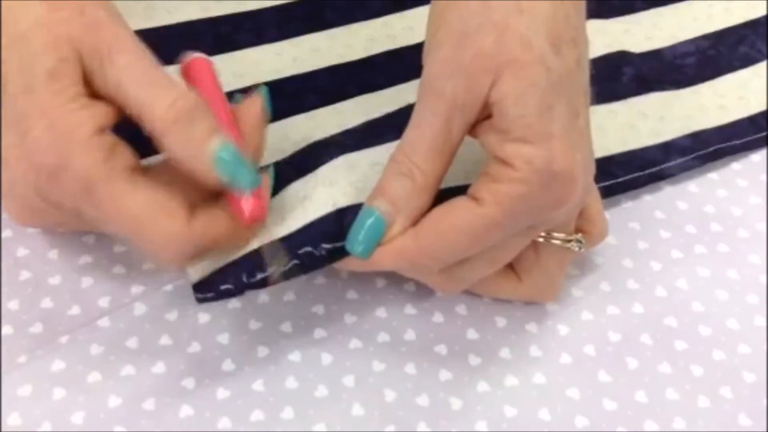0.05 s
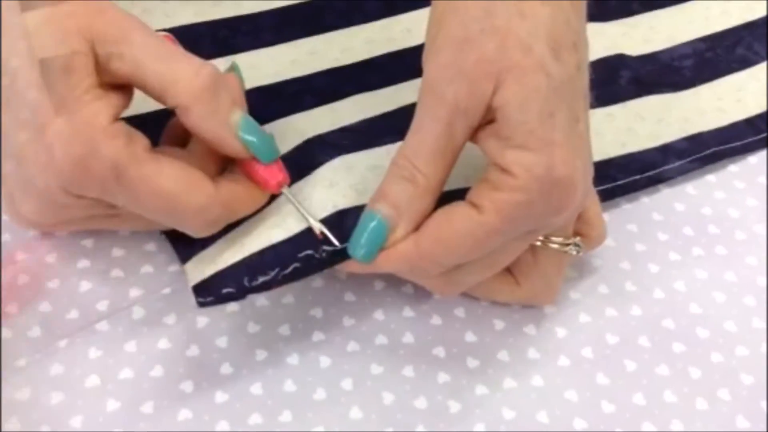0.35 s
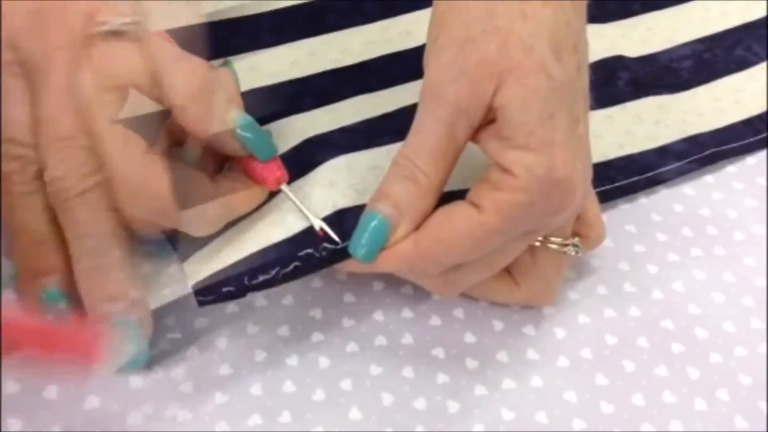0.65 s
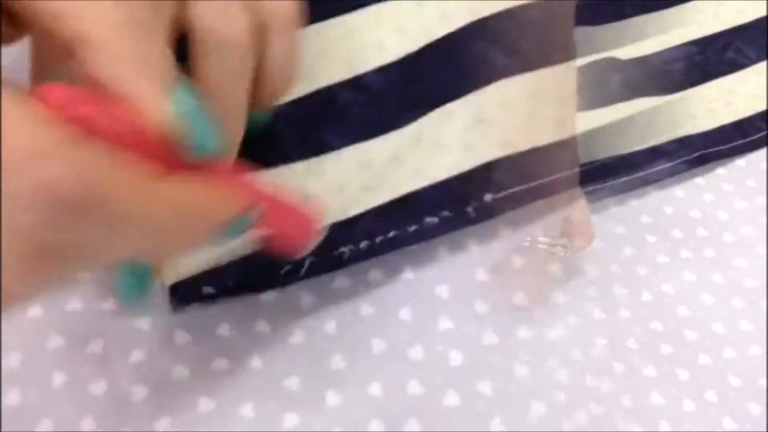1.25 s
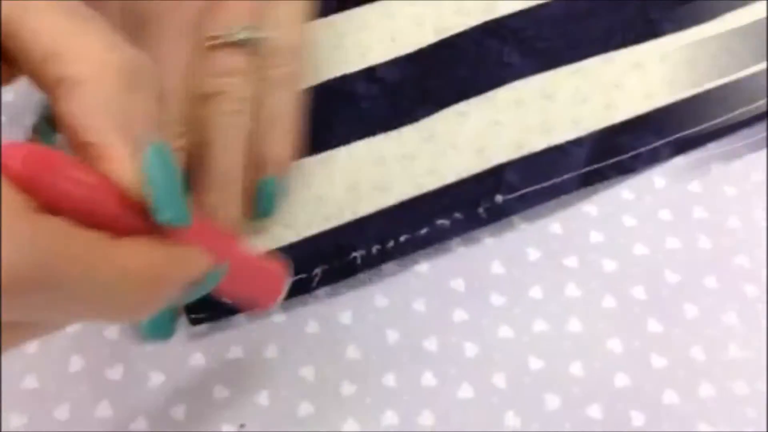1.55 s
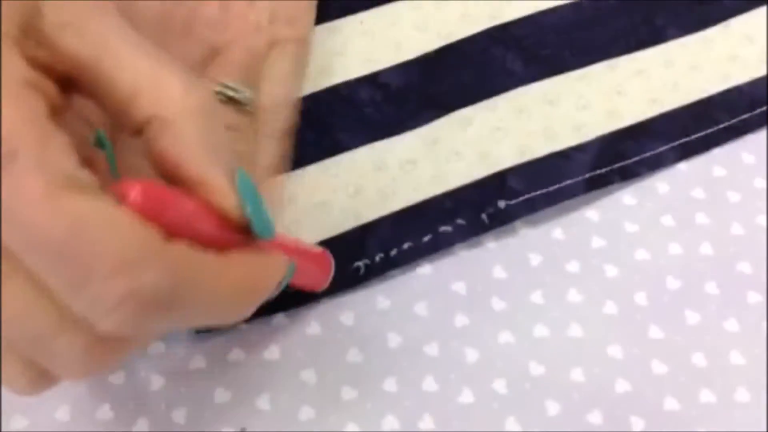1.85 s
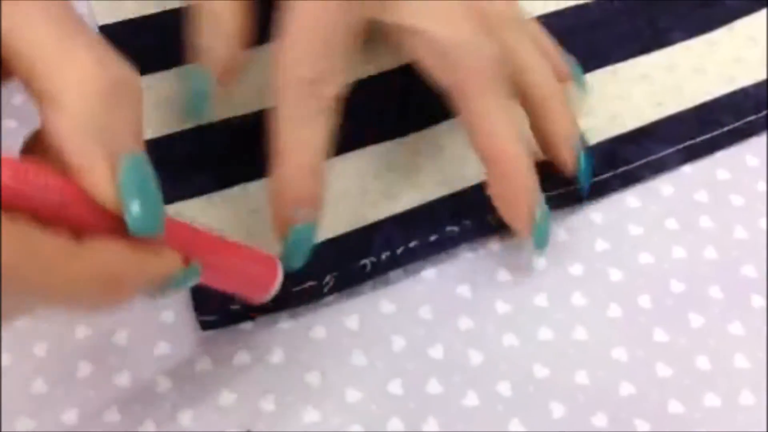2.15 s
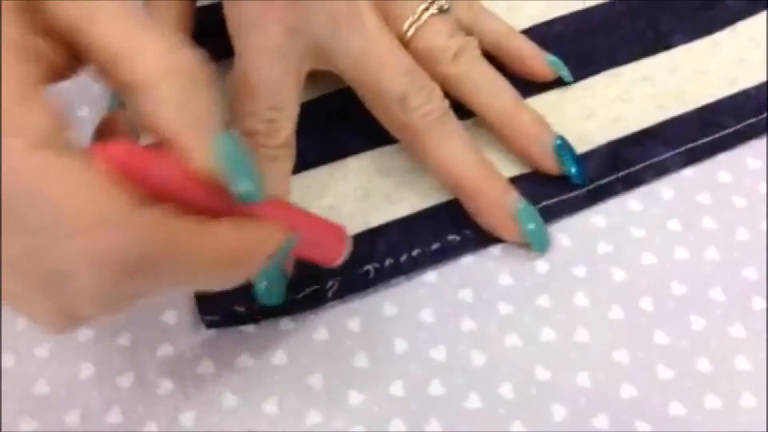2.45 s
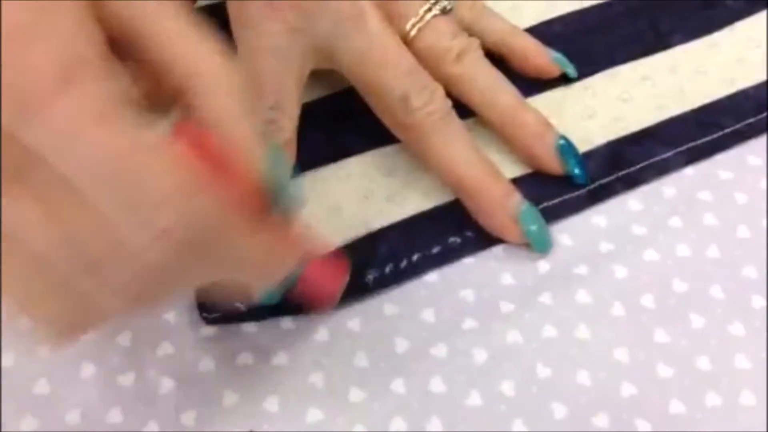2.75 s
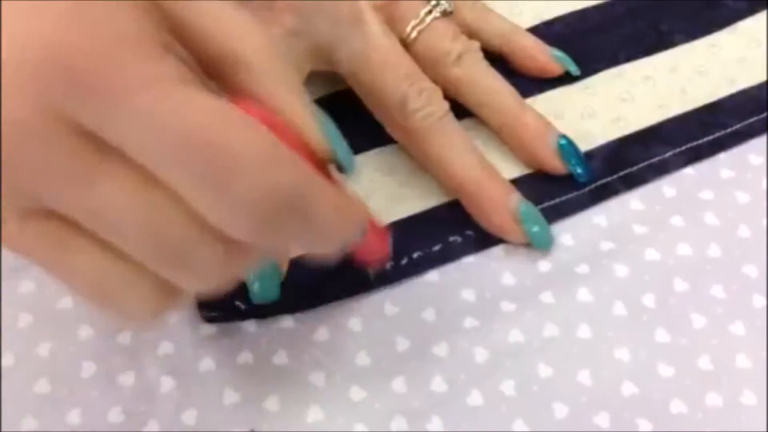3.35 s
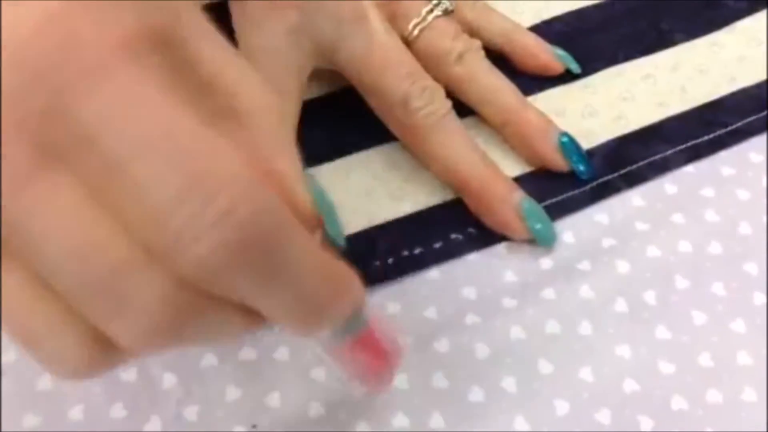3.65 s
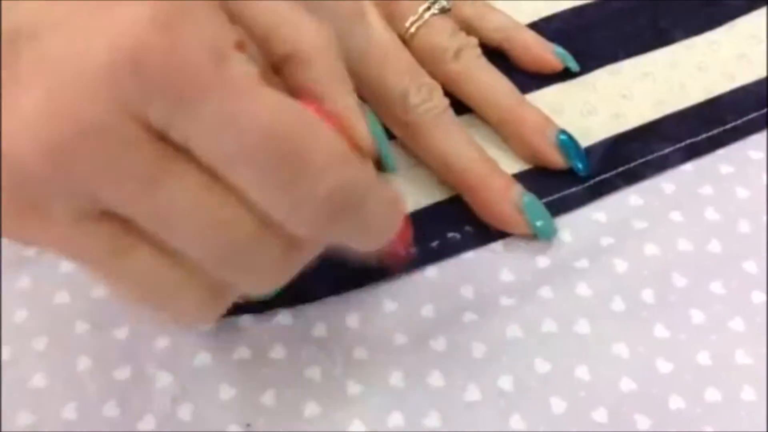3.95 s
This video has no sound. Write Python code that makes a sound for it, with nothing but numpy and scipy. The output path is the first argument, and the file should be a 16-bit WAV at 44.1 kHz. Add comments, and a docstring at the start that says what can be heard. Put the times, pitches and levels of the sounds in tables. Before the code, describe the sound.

A seam ripper scratches and rubs on cloth over a table, close by in a quiet room. A short scrape with light knocks comes at about 0.3 seconds. Until 2.3 seconds, hands swish over the fabric with scattered taps and faint ticks. From 2.6 seconds to the end at 4, the tool scrubs about five times a second, with raspy strokes, soft table bumps and tiny thread snaps.

```python
"""Seam ripper on cloth

Hands work close by on cloth spread over a table. A seam ripper scrapes and is turned round, palms
smooth the cloth and fingernails tap down. Then the tool's rubbery cap scrubs the seam about five
times a second: each stroke bumps the table top, rubs the weave and snaps at loose threads."""
import sys
import numpy as np
from scipy import signal
from scipy.fft import rfft, irfft
from scipy.io import wavfile

SR = 44100
rng = np.random.default_rng(int(sys.argv[2]) if len(sys.argv) > 2 else 0)


def generate_wav(sig):
    """Save sig (samples, or channels by samples) to the path in sys.argv[1] as 16-bit PCM at SR."""
    pcm = np.round(np.clip(np.atleast_2d(sig).T, -1, 1) * 32767).astype(np.int16)
    wavfile.write(sys.argv[1], SR, pcm)


N = 176400  # 4 seconds

# Drags over the weave, first to shift the cloth, then to scrub it: t/s, half length/s, level/dB
DRAGS = [(0.525, 0.044, -48.5), (1.152, 0.06, -48.5), (1.394, 0.029, -53), (2.65, 0.026, -48),
         (2.709, 0.018, -37.5), (2.776, 0.016, -43.5), (2.872, 0.039, -40.5), (2.998, 0.038, -49.5),
         (3.086, 0.024, -40.5), (3.142, .021, -40.5), (3.205, 0.02, -44), (3.301, 0.035, -37.5),
         (3.418, 0.019, -41), (3.49, 0.022, -36.5), (3.546, 0.013, -40.5), (3.641, .038, -40),
         (3.699, 0.021, -43), (3.768, 0.025, -41), (3.84, .027, -40), (3.93, 0.044, -41.5)]
# Tone of rubbed cloth: f/Hz, level/dB
CLOTH_TONE = [(300, -16), (1000, -3), (2000, -2.5), (3000, -4), (5000, -8), (6500, -6), (9000, -1.5),
              (12000, -3.5), (14000, -2), (16000, -3.5)]
# Middles of the bands in which the fibres rasp: f/Hz
RASP_BANDS = [5470, 7400, 14600]
FLUTTERS_PER_S = 200  # how fast the loudness of rubbing wavers


def scrubbing():
    """The cap or a finger drags across the weave, and fine fibres rasp under it in quick bunches."""
    pressure = sum(undb(db) * swell(at, width, width) for at, width, db in DRAGS)
    fibres = np.zeros(N)
    for hz in RASP_BANDS:
        catches = slips(per_s=1500, spread_db=3.3)
        fibres += colour(catches, around(hz, CLOTH_TONE, octaves=0.77))
    bunches = undb(6.5 * np.minimum(wander(FLUTTERS_PER_S), 2))
    rasp = undb(-2) * unit(fibres * bunches)
    weave = undb(-9.5) * noise(CLOTH_TONE)
    return pressure * (rasp + weave)


# Threads that catch and snap free: t/s, level/dB
THREAD_SNAPS = [(.469,-31.5),(0.5428,-27.5),(1.1068,-21),(1.151,-26),(1.173,-32.5),(1.1891,-26.5),(1.2715,-33.5),(1.3867,-33),(1.4142,-30.5),(2.644,-17),(2.695,-20.5),(2.708,-17),(2.7198,-18.5),(2.7702,-28),(2.81,-23),(2.886,-24.5),(2.8966,-26.5),(2.937,-23.5),(2.952,-22),(2.9999,-19.5),(3.0083,-13),(3.079,-13.5),(3.0885,-20),(3.1267,-16),(3.1531,-15),(3.255,-24),(3.2737,-24),(3.359,-14),(3.3626,-14.5),(3.3891,-23.5),(3.473,-24.5),(3.5514,-20.5),(3.565,-18),(3.569,-19),(3.6025,-20),(3.631,-19),(3.733,-23.5),(3.76,-19.5),(3.764,-22),(3.7759,-15.5),(3.81,-18),(3.8276,-16),(3.836,-19),(3.922,-21.5),(3.9406,-19.5)]


def thread_snaps():
    """Each thread lets go with a tiny high click, a brief rustle and a faint echo."""
    out, t = np.zeros(N), np.arange(SR // 20) / SR
    rustle = undb(-9.5) * np.exp(-t / 0.0012)
    echo = undb(-30) * np.exp(-t / 0.011)
    age = t / 0.000055  # reaches 1 where the click is strongest
    for at, db in THREAD_SNAPS:
        hz = 10020 * 2 ** (0.23 * rng.standard_normal())  # every snap has its own pitch
        click = age * np.exp(1 - age) * np.sin(2 * np.pi * hz * t)
        tail = (rustle + echo) * noise(around(hz, CLOTH_TONE, octaves=1), len(t))
        add(out, at, undb(db + 2) * (click + tail))
    return highpass(out, hz=2920)


# Notes the table top rings at: f/Hz, level/dB, time to fade by 60 dB/s
TABLE_NOTES = [(117.2, -8.5, 0.46), (187.9, -8, 0.25), (224.1, 1.5, 0.24), (313.5, -2.5, 0.17),
               (370, -12, 0.16), (546.7, -0.5, 0.092), (787, -16, 0.14), (866, -12.5, 0.17),
               (1218, 5, 0.043), (1510, -11, 0.02), (2130, 1.5, 0.036), (2440, 2, 0.026)]
# Tone of the dull thud in every blow: f/Hz, level/dB
THUD_TONE = [(90, -8), (180, 2), (300, -0.5), (430, -17), (700, -29.5)]
# Tone of the table's many crowded higher notes: f/Hz, level/dB
CLATTER_TONE = [(300, -57), (550, 4.5), (950, -2), (1350, 3), (2000, -2), (2700, -0.5), (3400, -14),
                (4200, 3), (5500, -31), (12000, -33)]


def table_ring(low_db=0, hard=True):
    """One blow makes the table ring and thud; a hard one makes it clatter too."""
    t = np.arange(SR // 2) / SR
    notes = []
    for hz, db, t60 in TABLE_NOTES:  # resting hands shift each note a little
        detune, louder = rng.standard_normal(2)
        notes.append((hz * (1 + 0.02 * np.tanh(detune)), db + 2 * louder, t60))
    thud_shape = fade(t, t60=0.19) * (1 - fade(t, t60=0.014))
    thud = undb(low_db - 0.5) * thud_shape * noise(THUD_TONE, len(t))
    clatter_shape = undb(10.5) * fade(t, t60=0.023) + undb(-4) * fade(t, t60=0.17)
    clatter = clatter_shape * noise(CLATTER_TONE, len(t))
    return ring(notes, low_db) + thud + hard * clatter


# Hard knocks of nail or tool: t/s, level/dB, treble cut-off/Hz, bass boost/dB, crack boost/dB
HARD_KNOCKS = [(0.3157, -38.5, 2160, 4, -22), (.359, -38, 1310, 2.5, -18), (.624, -49.5, 1740, 9, -30),
               (1.5112, -40.5, 1560, -1.5, -16), (1.5165, -36, 2970, -5, -6),
               (1.589, -40.5, 1570, -2.5, -24), (2.1751, -40, 2410, 1.5, -32),
               (2.271, -41, 3120, 0.5, -0.5), (2.6517, -38, 3220, 7.5, 5.5), (2.871, -40, 1910, 6.5, -4),
               (3.0745, -48, 3220, -29, -7), (3.078, -39, 2380, 2, 4.5), (3.2561, -43.5, 2620, -11, 5),
               (3.2873, -39, 3340, 3.5, 6), (3.49, -37, 1900, 2.5, -16), (3.688, -37, 2550, 2.5, 8.5),
               (3.872, -43, 2220, 4, 2.5)]
# Tone of the crack that starts a hard knock: f/Hz, level/dB
CRACK_TONE = [(600, -9), (2700, -4.5), (4200, -4), (7000, -43)]
# Soft bumps of the hand: t/s, level/dB, push length/s
SOFT_BUMPS = [(0.422, -43, 0.0007), (0.642, -39, 0.0029), (0.819, -47.5, 0.0025), (1.018, -42.5, 0.0029),
              (1.093, -41, 0.0022), (1.493, -47, 0.0036), (1.917, -42, 0.0045), (2.575, -34, 0.0037),
              (2.822, -33.5, 0.004), (3.027, -31, 0.0057), (3.239, -30, 0.0042), (3.438, -37, 0.0054),
              (3.631, -31.5, 0.0038), (3.821, -32.5, 0.0047)]


def knocks_and_bumps():
    """Hard knocks and soft pushes ring the same table top; a longer push sounds duller."""
    out, t = np.zeros(N), np.arange(SR // 50) / SR
    for at, db, cutoff_hz, low_db, crack_db in HARD_KNOCKS:
        knock = lowpass(table_ring(low_db), cutoff_hz, order=5)
        add(out, at, undb(db) * highpass(knock, hz=127))
        crack = undb(crack_db + 6.5) * fade(t, t60=0.01) * noise(CRACK_TONE, len(t))
        add(out, at, undb(db) * lowpass(crack, 2 * cutoff_hz))
    for at, db, length in SOFT_BUMPS:
        push = np.sin(np.pi * np.minimum(t / length, 1)) ** 2
        bump = signal.fftconvolve(table_ring(hard=False), push / push.sum())
        add(out, at, undb(db) * bump)
    return highpass(out, hz=181.4)  # the table gives off little deep bass


# The tool judders over the table: t/s, rise/s, fall/s, level/dB
TOOL_SCRAPES = [(.358, .014, .015, -29.5), (.665, .03, .04, -53), (1.6, .04, .035, -48)]
# Notes of the dragged tool and the table under it: f/Hz, level/dB, time to fade by 60 dB/s
SCRAPE_NOTES = [(219, -11, 0.24), (334.6, -4, 0.12), (553, 0, 0.067), (760, 1, 0.036), (888, 0, 0.034),
                (1230, 0.5, 0.02), (1540, -12, 0.017), (2116, -3, 0.049), (2510, -1.5, 0.022)]


def tool_scrapes():
    """The hard tool sticks and slips, which sets off a hollow ring with some grit on top."""
    force = sum(undb(db) * swell(at, rise, fall) for at, rise, fall, db in TOOL_SCRAPES)
    judder = unit(slips(per_s=2200, spread_db=5))
    body = highpass(ring(SCRAPE_NOTES), hz=218)
    hollow = signal.fftconvolve(force * judder, body / np.linalg.norm(body))[:N]
    grit = undb(-17.5) * force * colour(judder, CLATTER_TONE)
    return hollow + grit


# Palms smooth the cloth:
# t/s, rise/s, fall/s, level/dB, rush against hiss/dB, rush middle/Hz, hiss tilt/dB per octave
PALM_SWEEPS = [(0.349, 0.028, 0.038, -42.5, -0.5, 1370, .5), (0.671, 0.074, 0.037, -53, -6, 1900, 1.5),
               (.815, 0.072, 0.043, -64, 7, 3040, -2), (1.07, 0.022, 0.03, -47, -2.5, 1950, -1.5),
               (1.32, 0.019, 0.016, -40, -6, 1360, 5), (1.593, 0.046, 0.042, -43.5, -4.5, 1630, 3.5),
               (1.82, 0.15, 0.12, -60, 3, 2250, -2.5), (1.936, 0.017, 0.023, -45, -1.5, 2550, .5),
               (2.376, 0.01, 0.012, -64.5, 7.5, 2940, 2)]
# Tone of the fine hiss of skin on cloth: f/Hz, level/dB
HISS_TONE = [(1500, -40), (3000, 1.5), (4300, 4.5), (6300, -4), (8000, 2.5), (10500, 0.5), (12500, -2),
             (15000, -4.5)]
# Tone of the lower rush under it: f/Hz, level/dB
RUSH_TONE = [(100, -27.5), (220, 20), (420, 2), (600, 5.5), (900, -2), (1300, -2.5), (2000, -13.5),
             (2550, -4), (3200, -19), (4200, -8), (7000, -31)]


def palm_sweeps():
    """Skin slides on cloth with a grainy hiss over a lower rush; both flutter as the hand drags."""
    out, grain = np.zeros(N), slips(per_s=5000, spread_db=3)
    for at, rise, fall, db, rush_db, rush_hz, tilt_db in PALM_SWEEPS:
        hiss = colour(grain, [(hz, level + tilt_db * np.log2(hz)) for hz, level in HISS_TONE])
        rush = undb(rush_db) * noise(around(rush_hz, RUSH_TONE, octaves=0.82))
        out += undb(db) * swell(at, rise, fall) * (hiss + rush)
    return out * undb(1.7 * wander(FLUTTERS_PER_S))


# Tone of the quiet room: f/Hz, level/dB
ROOM_TONE = [(30, -28), (100, -26), (210, 3.5), (300, -13), (480, -17.5), (2300, -22), (4500, -25.5),
             (15000, -27)]


def room():
    """A faint, steady, low noise lies behind everything."""
    return undb(-63.5) * noise(ROOM_TONE)


def undb(db):
    """Turn decibels into a number to multiply by."""
    return 10 ** (np.asarray(db) / 20)


def unit(x):
    """Scale a sound to an average strength (rms) of 1."""
    return x / np.sqrt(np.mean(x ** 2))


def colour(x, tone):
    """Shape a sound by a tone table, at strength 1."""
    hz, db = np.array(tone).T
    f = np.maximum(np.fft.rfftfreq(len(x), 1 / SR), 1)
    gain = undb(np.interp(np.log(f), np.log(hz), db))
    return unit(irfft(rfft(x) * gain, len(x)))


def noise(tone, samples=N):
    """Steady noise with the given tone."""
    return colour(rng.standard_normal(samples), tone)


def around(middle_hz, tone, octaves):
    """Turn a tone table down away from one frequency."""
    return [(hz, db - 4 * (np.log2(hz / middle_hz) / octaves) ** 2) for hz, db in tone]


def slips(per_s, spread_db):
    """Random tiny jolts of sticking and slipping, mostly small, a few large."""
    size = undb(spread_db * np.minimum(rng.exponential(size=N), 4))
    happens = rng.random(N) < per_s / SR
    return happens * size * rng.choice([-1, 1], N)


def wander(per_s):
    """Glide between random values, per_s of them a second."""
    steps = np.arange(N) / SR * per_s
    return np.interp(steps, np.arange(N), rng.standard_normal(N))


def swell(at, rise, fall):
    """The pressure of one movement builds up, peaks and eases off."""
    t = np.arange(N) / SR - at
    return np.exp(-0.5 * (t / np.where(t < 0, rise, fall)) ** 2)


def fade(t, t60):
    """Die away by 60 dB every t60 seconds."""
    return np.exp(-np.log(1000) * t / t60)


def ring(notes, low_db=0):
    """Half a second of fading pure notes; low_db lifts those under 450 Hz."""
    t = np.arange(SR // 2) / SR
    return sum(undb(db + low_db * (hz < 450)) * np.sin(2 * np.pi * hz * t) * fade(t, t60)
               for hz, db, t60 in notes)


def lowpass(x, hz, order=3):
    """Soften everything above hz."""
    return signal.sosfilt(signal.butter(order, min(hz, SR / 3), fs=SR, output="sos"), x)


def highpass(x, hz):
    """Soften everything below hz."""
    return signal.sosfilt(signal.butter(2, hz, "high", fs=SR, output="sos"), x)


def add(out, at, x):
    """Mix x into out at a time in seconds."""
    i = int(at * SR)
    out[i:i + len(x)] += x[:N - i]


def scene():
    """Table, tool, cloth and threads over a quiet room, in one channel."""
    mix = knocks_and_bumps() + tool_scrapes() + palm_sweeps() + scrubbing() + thread_snaps() + room()
    return mix[None]


def record(dry):
    """Cut off the very highest treble."""
    top_hz = 15250
    return signal.sosfilt(signal.ellip(10, 0.2, 70, top_hz, fs=SR, output="sos"), dry)


dry = scene()
out = record(dry)
generate_wav(out)
```